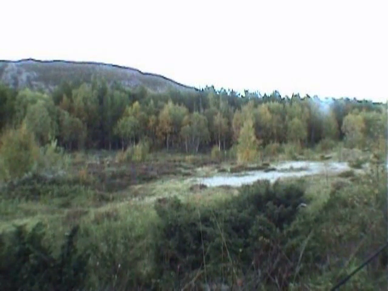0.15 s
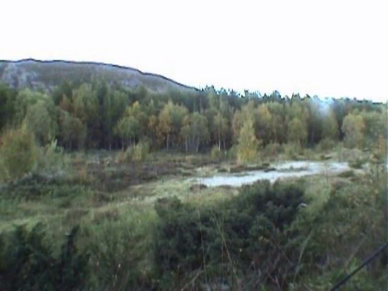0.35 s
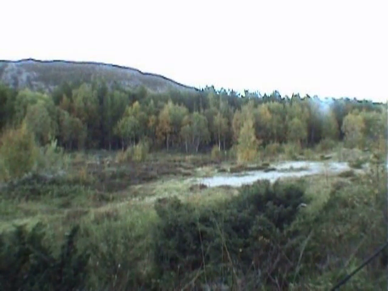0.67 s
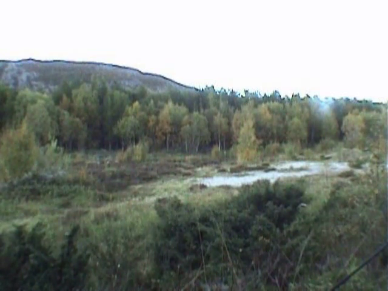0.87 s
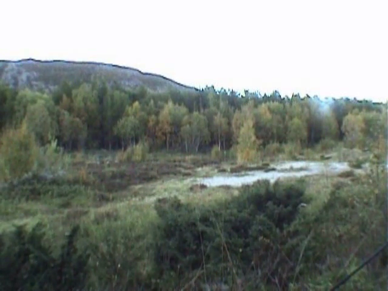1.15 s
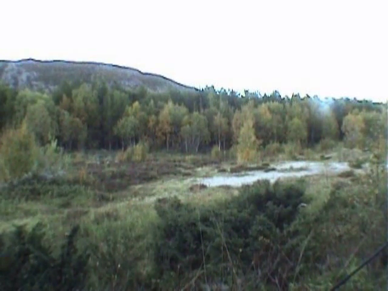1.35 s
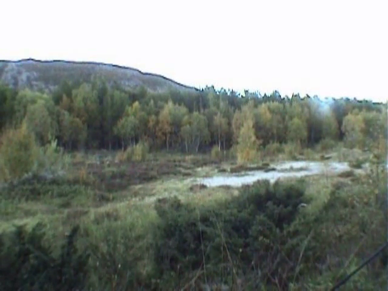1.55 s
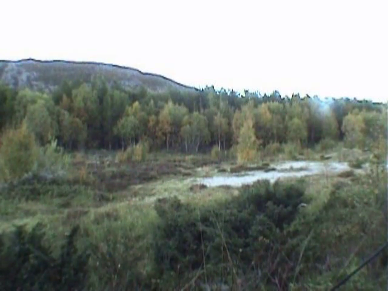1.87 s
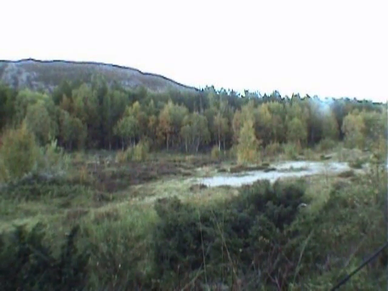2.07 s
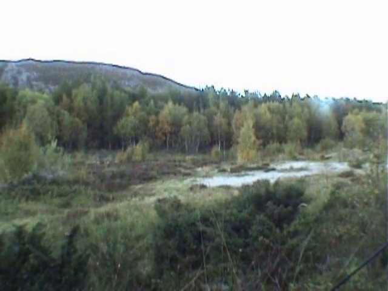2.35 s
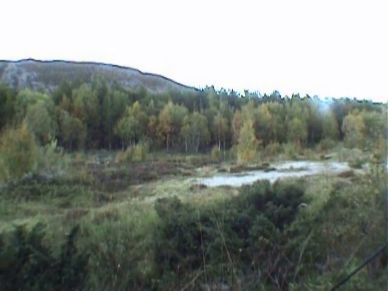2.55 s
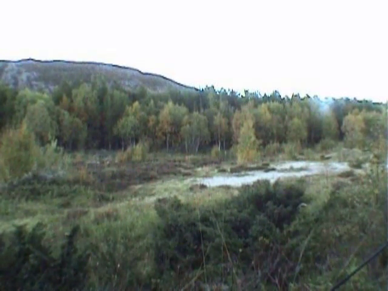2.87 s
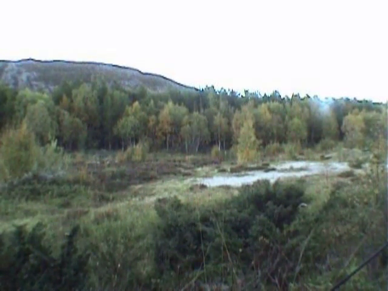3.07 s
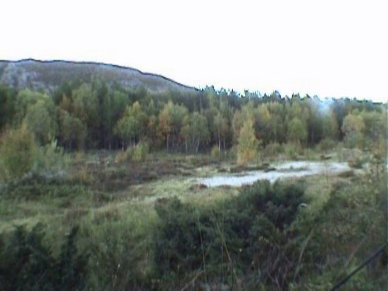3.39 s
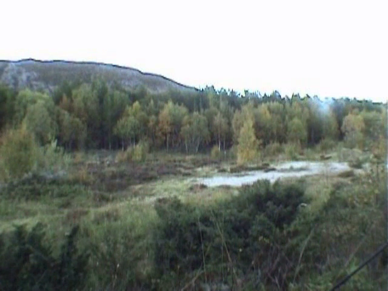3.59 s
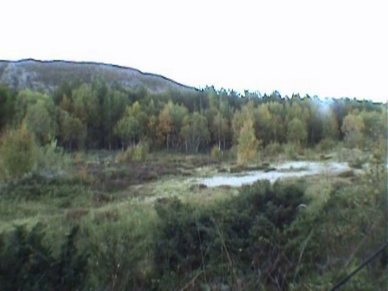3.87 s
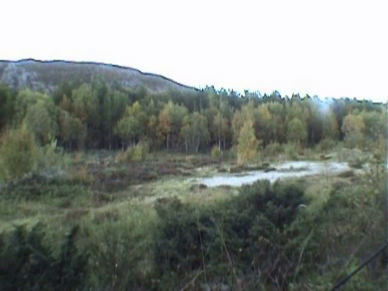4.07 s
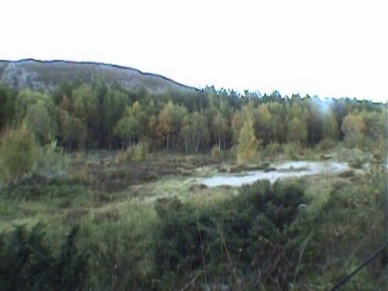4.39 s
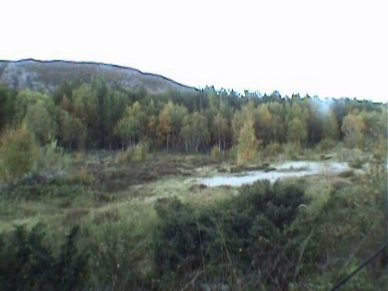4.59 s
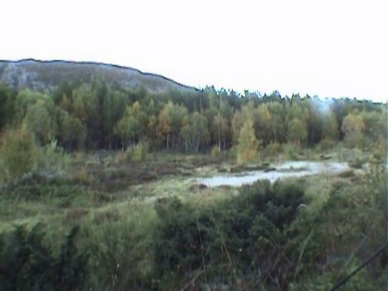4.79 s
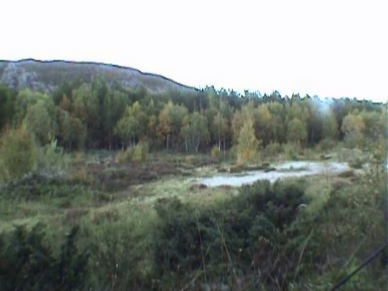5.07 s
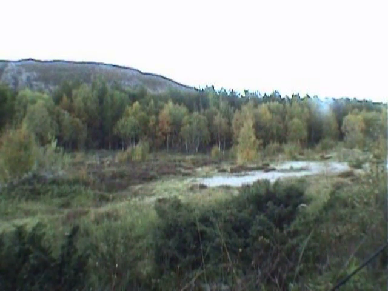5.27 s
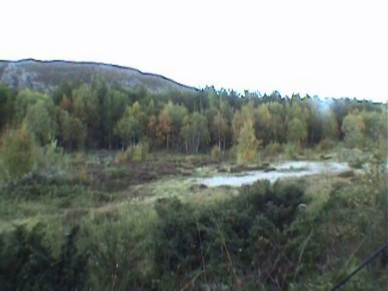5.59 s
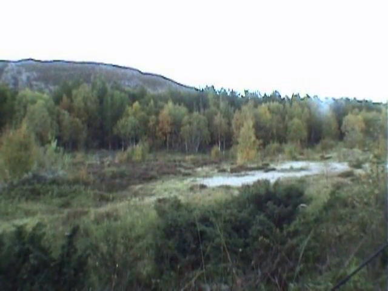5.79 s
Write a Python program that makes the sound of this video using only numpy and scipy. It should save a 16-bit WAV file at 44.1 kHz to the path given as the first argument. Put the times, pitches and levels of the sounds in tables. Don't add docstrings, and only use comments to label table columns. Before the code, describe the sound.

Open heath with forest behind: one hunting dog, some way off, sends out three high, ringing yelps, then nothing but woodland reverberation, camera hiss, buzz and little twig or cloth rubs. Two further yelps follow, strong then softer, again trailing a smeared echo. Digital ticks roughen the calls. Near the end, close rustling and a few muffled wind bumps push the camera's small stereo microphone.

```python
import sys
import numpy as np
from scipy import signal
from scipy.fft import rfft, irfft, next_fast_len
from scipy.io import wavfile
from scipy.ndimage import uniform_filter1d

SR = 44100
rng = np.random.default_rng(int(sys.argv[2]) if len(sys.argv) > 2 else 0)


def natural_amplitude(level_db):
    exponent = np.asarray(level_db, float) / 20
    return 10 ** exponent


def transcribe(u):
    v = np.clip(np.atleast_2d(u).T, -1, 1)
    q = np.round(v * 32767).astype(np.int16)
    wavfile.write(sys.argv[1], SR, q)


N = 261513

# (frequency [Hz], left minus right [dB])
DOG_BALANCE = [(700, -3.5), (1700, -2.5), (2600, 0.5), (5000, -3.5)]


def at_hz(points, hz):
    curve_hz, curve_db = np.transpose(points)
    return np.interp(np.log(np.maximum(hz, 1)), np.log(curve_hz), curve_db)


def sides(pan_db, lead_s, hz):
    half = pan_db / 2 * np.log(10) / 20 + 1j * np.pi * hz * lead_s
    return np.exp(np.array([half, -half]))


def drift(size, rate):
    r = np.exp(-2 * np.pi * rate / SR)
    slow = signal.lfilter([1], [1, -2 * r, r * r], rng.standard_normal(size + 8000))[8000:]
    return slow / slow.std()


def band(sound, order, hz, kind="low"):
    return signal.sosfilt(signal.butter(order, hz, kind, fs=SR, output="sos"), sound)


def hound():
    # (time [s], pitch [Hz], level [dB], gape [0 shut, 1 open, 2 wide])
    first_bout = [
        [(1.604, 726, -53.5, 0), (1.622, 836.5, -24, 0.07), (1.643, 934, -20.5, 0.84),
         (1.664, 893.5, -20.5, 0.96), (1.686, 884.7, -15, 0.98), (1.706, 903.7, -17, 0.85),
         (1.724, 800, -20, 1.24), (1.742, 609, -28.5, 0.0094), (1.752, 472, -47, .5)],
        [(2.031, 677, -48, 1.56), (2.04, 712, -24, 0.57), (2.06, 808, -18.5, 0.84), (2.085, 800.5, -17.5, .8),
         (2.125, 759, -24, 1.04), (2.142, 643, -28, 0.18), (2.153, 580, -29.5, 0.65), (2.163, 442, -52, .8)],
        [(2.364, 509, -39.5, 0.73), (2.385, 662.5, -25, 0.97), (2.4, 697.5, -18.5, .5),
         (2.423, 689.4, -17.5, -0.19), (2.431, 777, -19.5, 1.12), (2.45, 817.4, -21, 0.77),
         (2.468, 795.6, -20.5, 1.48), (2.49, 667.6, -27, -0.11), (2.506, 546, -32, 0.66)],
    ]
    second_bout = [
        [(4.271, 696, -29, 1.7), (4.283, 759, -26, 1.2), (4.304, 876, -21, 0.65), (4.326, 891.3, -17, 1.38),
         (4.352, 897.3, -11.5, 1.04), (4.372, 876.5, -18.5, 1.06), (4.392, 780, -23, 0.62),
         (4.408, 661, -28, 0.46), (4.42, 530, -48, 1.3)],
        [(4.628, 613, -37.5, 1.4), (4.645, 732.4, -25, 0.48), (4.664, 823, -19.5, 1.16),
         (4.69, 862.4, -18.5, 1.05), (4.712, 866.4, -18, 0.85), (4.728, 785, -27, 1.03),
         (4.745, 650, -27, 0.14), (4.76, 518, -44, 0.75)],
    ]
    # (returns, by how squarely it faces the trees [dB],
    # top overtones against the second [dB], hoarseness [dB], fourth overtone [dB])
    manners = [
        (0, -41.5, -34, -5.5),
        (.1, -40.5, -34.5, -6),
        (-0.3, -41.5, -36.5, 0),
        (-1.5, -36.5, -32.5, 2.5),
        (.1, -33, -33.5, 3.5),
    ]
    # (scrub [dB], tree line delay [s], tree line [dB], deep wood [dB],
    # deep wood time to fall 60 dB [s])
    stands = [
        (-32.5, 0.11, -51, -43.5, 1.52),
        (-40.5, .1, -48, -41.5, 1.66),
    ]
    direct, sent = np.zeros((2, N)), np.zeros(N)
    for rows, (echo_db, *manner) in zip(first_bout + second_bout, manners):
        start, sound = yelp(rows, *manner)
        span = slice(start, start + sound.shape[1])
        direct[:, span] += sound
        sent[span] += natural_amplitude(echo_db) * sound.mean(axis=0)
    moved = round(3.9 * SR)
    echoes = np.hstack([woodland(sent[:moved], stands[0]), woodland(sent[moved:], stands[1])])
    return direct + rasp(sent) + echoes


def yelp(rows, top_db, breath_db, fourth_db, crack_db=16, strain=1.16, lead_s=-0.000023):
    # (frequency [Hz], level [dB])
    mouth_colour = [(2800, -5.5), (3600, 18), (4100, 6.5), (4500, -7), (5000, 0), (5400, -4.5), (5700, 9),
                    (6200, 3), (7100, 1.5), (7700, -9.5), (9000, -38)]
    end_s, end_hz = rows[-1][:2]
    tail = (end_s + 0.022, end_hz - 140, -58.5, 0)
    s, *columns = np.transpose(rows + [tail])
    t = np.arange(s[0], s[-1], 1 / SR)
    pitch, level_db, gape = [uniform_filter1d(np.interp(t, s, c), size=260, mode="nearest") for c in columns]
    low = overtones(pitch, level_db, gape)
    turn = 2 * np.pi * np.cumsum(pitch * (1 + 0.002 * drift(len(t), 81))) / SR
    effort = low[1].max() + strain * (low[1] - low[1].max())
    slack = np.clip(1 - (t - s[0]) / 0.044, 0, 1)
    low[3] = low[3] + fourth_db - 5 * slack
    top = [effort - 13.5 * slack + top_db + at_hz(mouth_colour, k * pitch) for k in range(5, 10)]
    falling = np.clip(-np.gradient(pitch) * SR / 9000, 0, 1)
    out = np.zeros((2, len(t)))
    for k, level in enumerate(natural_amplitude(low + top), start=1):
        rough_db = 5 + 4.5 * falling if k > 4 else crack_db * falling
        air = drift(len(t), 200) + 1j * drift(len(t), 200)
        skirt = k ** 1.2 * natural_amplitude(breath_db + rough_db) * air
        flutter = natural_amplitude(0.35 * k * drift(len(t), 77))
        tone = -np.sqrt(2) * level * flutter * (1 + skirt) * np.exp(1j * (k * turn + 0.55 * k * k))
        out += np.real(tone * sides(at_hz(DOG_BALANCE, k * pitch), lead_s, k * pitch))
    edge = np.clip(np.minimum(t - s[0], s[-1] - t) / 0.003, 0, 1)
    return round(s[0] * SR), out * edge


def overtones(pitch, level_db, gape):
    # (frequency [Hz], level with mouth shut [dB], gain by opening it [dB])
    throat_colour = [(400, -4, -7.5), (850, 2, -11), (1310, -6.5, 1), (1745, -3.5, 7), (2100, -24.5, 20),
                     (2580, -23.5, 17), (3000, -34.5, 5.5), (3600, -36, 12)]
    hz, shut_db, gain_db = np.transpose(throat_colour)
    overtone_hz = np.arange(1, 5)[:, None] * pitch
    at = np.log(overtone_hz)
    db = np.interp(at, np.log(hz), shut_db)
    db += np.clip(gape, -0.5, 2.5) * np.interp(at, np.log(hz), gain_db)
    notch_hz, notch_width_hz, notch_db = 3060, 86, -17
    db += notch_db * np.exp(-((overtone_hz - notch_hz) / notch_width_hz) ** 2)
    return list(level_db + db - 10 * np.log10(np.sum(natural_amplitude(2 * db), axis=0)))


def rasp(voice):
    linger_s = 0.035
    r = np.exp(-1 / (linger_s * SR))
    flow = signal.lfilter([1 - r], [1, -r], np.abs(voice))
    air = band(rng.standard_normal((3, N)), 2, [2800, 5500], "band")
    return natural_amplitude(-36) * flow * (air[0] + 0.7 * air[1:]) / air.std()


def woodland(voice, stand, alike=0.75, near_s=0.062, clump_db=3.5, lead_s=4e-5):
    # (frequency [Hz], level [dB])
    wood_colour = [(400, -1.5), (800, -4.5), (1700, -8), (2600, -7.5), (3000, -10.5), (3600, -24.5),
                   (5000, -22), (7000, -18)]
    # (frequency [Hz], left minus right [dB])
    wood_balance = [(700, -0.5), (1700, 2.5), (2600, 5), (5000, 8)]
    t = np.arange(0, 1.4, 1 / SR)
    shape = returns(t, *stand) * natural_amplitude(clump_db * drift(len(t), 29))
    shared, left, right = rng.standard_normal((3, len(t))) * shape
    near = np.exp(-(t / near_s) ** 2)
    far = np.sqrt(alike) * shared + np.sqrt(1 - alike) * np.array([left, right])
    far = np.sqrt(1 - near) * far
    dull = band(far, 2, 1500)
    far = dull + np.exp(-t / 0.67) * (far - dull)
    dull = signal.sosfiltfilt(signal.butter(4, 3000, fs=SR, output="sos"), far)
    far = dull + np.exp(-t / 0.083) * (far - dull)
    size = next_fast_len(len(voice) + len(t))
    hz = np.fft.rfftfreq(size, 1 / SR)
    response = rfft(far, size) * sides(at_hz(wood_balance, hz), lead_s, hz)
    response += rfft(np.sqrt(near) * shared, size) * sides(at_hz(DOG_BALANCE, hz), 0, hz)
    return irfft(rfft(voice, size) * response * natural_amplitude(at_hz(wood_colour, hz)), size)[:, :len(voice)]


def returns(t, scrub_db, line_s, line_db, wood_db, t60):
    scrub = natural_amplitude(scrub_db - 60 * t / 0.21) * np.clip(t / 0.019, 0, 1) ** 2
    line = natural_amplitude(line_db) * np.exp(-((t - line_s) / 0.02) ** 2)
    wood = natural_amplitude(wood_db - 60 * t / t60) * (1 - np.exp(-(t / 0.071) ** 2))
    slopes = natural_amplitude(-76)
    return np.sqrt(scrub ** 2 + line ** 2 + wood ** 2 + slopes ** 2)


def camera():
    # (frequency [Hz], level [dB per Hz])
    mid_colour = [(12, -44.5), (20, -8), (74, -9.5), (156, -9), (220, -7), (269, -12), (344, -4.5),
                  (579, -4.5), (949, -10.5), (1250, -5.5), (1450, -11), (3190, -17), (4620, -24.5),
                  (6220, -22), (7400, -21.5), (9620, -56), (16300, -120)]
    side_colour = [(12, -54.5), (20, -18), (353, -5), (688, -5), (798, -4), (1130, -7), (1480, -2.5),
                   (1810, -11.5), (1950, -8.5), (2370, -13), (3040, -13.5), (3520, -16.5), (7400, -27),
                   (9620, -56), (16300, -120)]
    # (frequency [Hz], rms level [dB])
    mid_tones = [(107.7, -82), (220.7, -64.5), (576.0, -70), (597.5, -69), (1265, -72.5), (1497, -86),
                 (1631, -80), (1798, -100), (2099, -79.5), (2401, -78), (2632, -79), (2821, -82.5),
                 (2998, -78), (3085, -78.5), (3278, -77.5), (3994, -83.5), (4183, -81), (4953, -88),
                 (5819, -89), (5905, -83.5), (6202, -81.5), (6363, -88.5), (6584, -107.5), (6815, -110),
                 (6896, -103), (7181, -94)]
    side_tones = [(46, -83), (1460, -90.5), (1540, -75.5), (1912, -75), (2725, -87), (3050, -77.5)]
    mid = natural_amplitude(-55 + 0.15 * drift(N, 13.0)) * coloured(mid_colour, gear_db=14.5)
    mid += whine(mid_tones, waver_db=1.5, waver_rad=0.15)
    side = natural_amplitude(-54 + 0.7 * drift(N, 3)) * coloured(side_colour, gear_db=11.5)
    side += whine(side_tones, waver_db=7.0, waver_rad=0.6)
    return np.array([mid + side, mid - side])


def coloured(spectrum, gear_db):
    size = next_fast_len(N)
    hz = np.fft.rfftfreq(size, 1 / SR)
    chosen = rng.random(len(hz)) < 0.004
    gears = natural_amplitude(gear_db + 3.5 * rng.standard_normal(len(hz))) * chosen * np.sqrt(size)
    gears = gears * rng.choice([-1, 1], len(hz))
    colour = natural_amplitude(at_hz(spectrum, np.minimum(hz, 7350)))
    out = irfft((rfft(rng.standard_normal(size)) + gears) * colour, size)[:N]
    return out / out.std()


def whine(tones, waver_db, waver_rad):
    t = np.arange(N) / SR
    sway = [drift(N, 7.0) for _ in range(4)]
    out = np.zeros(N)
    for k, (hz, db) in enumerate(tones):
        level = natural_amplitude(db + min(hz / 600, 1) * waver_db * sway[k % 4])
        phase = 2 * np.pi * hz * t + waver_rad * sway[(k + 2) % 4] + k * k
        out += np.sqrt(2) * level * np.sin(phase)
    return out


def drum():
    # (peak time [s], level per overtone [dB], time to fall 60 dB [s])
    drum_swells = [
        (1.45, -60.5, 0.5),
        (3.58, -60, 1.1),
    ]
    t = np.arange(N) / SR
    buzz = sum(np.sin(2 * np.pi * k * 299.7 * t + k * k) * k ** -0.5 for k in range(4, 11))
    level = natural_amplitude(-89)
    for s, db, t60 in drum_swells:
        rise_db, fall_db = 30 * (s - t) / 0.12, 60 * (t - s) / t60
        level = level + natural_amplitude(db - np.maximum(rise_db, fall_db))
    return 1.4 * level * buzz


def rustles(spread=1.28, pan_db=1.5):
    # (time [s], peak level [dB], centre [Hz], length [s])
    rub_events = [
        (3.039, -58, 2613, 0.0045),
        (3.095, -66, 2700, 0.0091),
        (3.274, -62, 2292, 0.0045),
        (3.441, -56, 2020, 0.0083),
        (3.484, -63, 2100, 0.012),
        (3.868, -60.5, 3000, 0.01),
        (4.026, -63.5, 2970, 0.052),
        (5.079, -59.5, 2900, 0.15),
        (5.26, -59, 4580, 0.018),
        (5.304, -64, 4380, 0.031),
    ]
    out = np.zeros(N)
    t = np.arange(-0.15, 0.15, 1 / SR)
    for s, db, hz, length in rub_events:
        puff = band(rng.standard_normal(len(t)), 2, [hz / spread, hz * spread], "band")
        start = round((s + t[0]) * SR)
        out[start:start + len(t)] += natural_amplitude(db) * puff / puff.std() * np.exp(-(t / length) ** 2)
    return out * natural_amplitude([[pan_db / 2], [-pan_db / 2]])


def bumps(width_s=0.0046, cross=0.36):
    # (time [s], peak level [dB])
    port_puffs = [
        [(5.209, -37), (5.278, -34), (5.36, -43)],
        [(5.224, -43), (5.286, -33.5)],
    ]
    t, out = np.arange(N) / SR, np.zeros((2, N))
    for port, puffs in zip((1, 0), port_puffs):
        for s, db in puffs:
            away = ((t - s) / width_s) ** 2
            out[port] += natural_amplitude(db) * (1 - away) * np.exp(-away / 2)
    return out - cross * out[::-1]


def slips(sound):
    # (first [s], last [s], gap [s], level against the sound [dB])
    slip_beats = [
        (1.5862, 1.76, .02292, -30),
        (2.0446, 2.26, .02292, -31),
        (2.385, 2.51, .02365, -32),
        (4.2771, 4.57, .02857, -29),
        (4.6485, 4.8, .02857, -32),
    ]
    # (time [s], peak level [dB], left minus right [dB])
    hard_slips = [(1.7009, -37.5, -5), (2.067, -40.5, -4), (2.09, -44, 1), (2.2684, -59, -4),
                  (2.4329, -36.5, -1), (4.2775, -46.5, 6.5), (4.334, -33.5, -1), (4.669, -53, 0),
                  (4.6811, -65, -5), (4.706, -38, -7.5), (4.963, -64.5, 9)]
    loud_db = 10 * np.log10(uniform_filter1d(np.mean(sound ** 2, axis=0), size=600) + 1e-12)
    events = list(hard_slips)
    for first, last, gap, beat_db in slip_beats:
        for s in np.arange(first, last, gap):
            luck, side_luck = rng.standard_normal(2)
            db = beat_db - 4 + 0.7 * loud_db[round(s * SR)] + 2.5 * luck
            events.append((s, db, 3 * side_luck))
    return events


def clicks(events, gain_db):
    out = np.zeros((2, N))
    for s, db, *pan in events:
        out[:, round(s * SR)] += natural_amplitude(db + gain_db + np.array([0.5, -0.5]) * sum(pan))
    return out


def scene():
    return hound() + camera() + drum() + rustles() + bumps()


def roll_off(x):
    return signal.sosfilt(signal.butter(12, 16460, fs=SR, output="sos"), x)


def record(dry):
    # (frequency [Hz], level [dB])
    track_edge = [(7300, 0), (7600, -7), (7900, -13), (8100, -22), (8220, -48), (8400, -80)]
    # (time [s], peak level [dB])
    big_slips = [
        (1.769, -33),
        (2.268, -34),
        (4.6825, -12.5),
    ]
    size = next_fast_len(N)
    edge = natural_amplitude(at_hz(track_edge, np.fft.rfftfreq(size, 1 / SR)))
    narrow = irfft(rfft(dry, size) * edge, size)[:, :N]
    loudness = uniform_filter1d(np.abs(narrow), size=200, axis=1)
    haze = natural_amplitude(-50.5) * loudness ** 0.92 * rng.standard_normal(dry.shape)
    late_clicks = np.roll(clicks(slips(narrow), gain_db=9.5), 60, axis=1)
    ticks = band(late_clicks + haze, 2, 5000, "high")
    jumps = band(clicks(big_slips, gain_db=12.5), 1, 1800)
    top = signal.ellip(10, 0.2, 40, 15830, fs=SR, output="sos")
    return roll_off(signal.sosfiltfilt(top, narrow + ticks + jumps))


dry = scene()
out = record(dry)
transcribe(out)
```